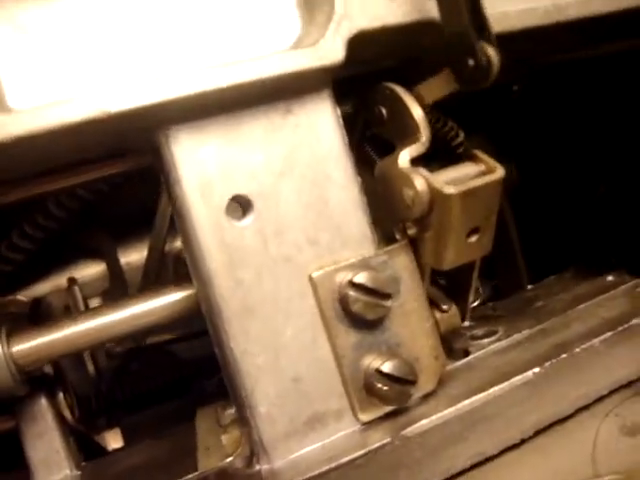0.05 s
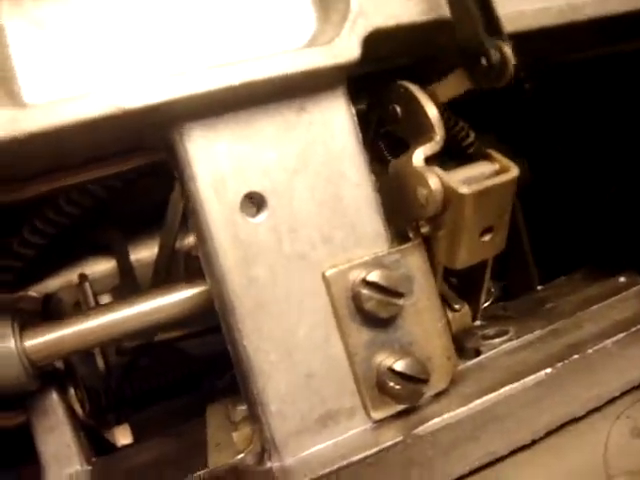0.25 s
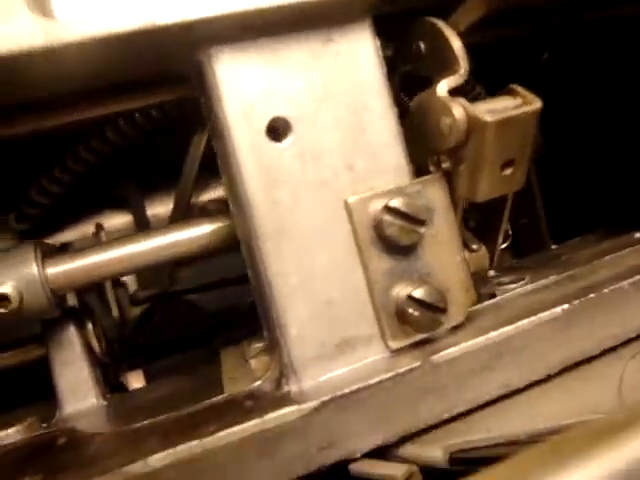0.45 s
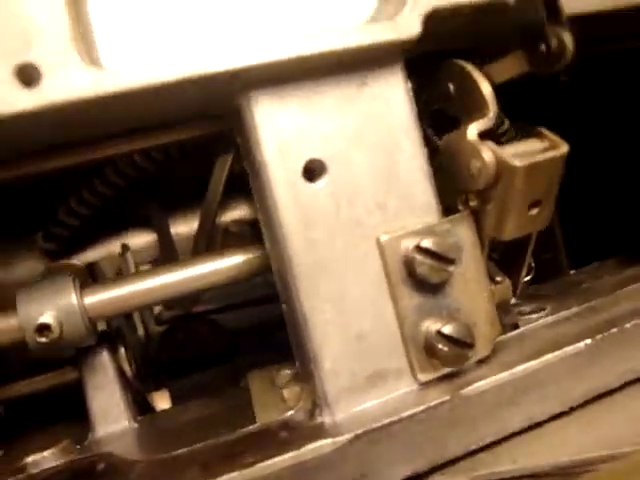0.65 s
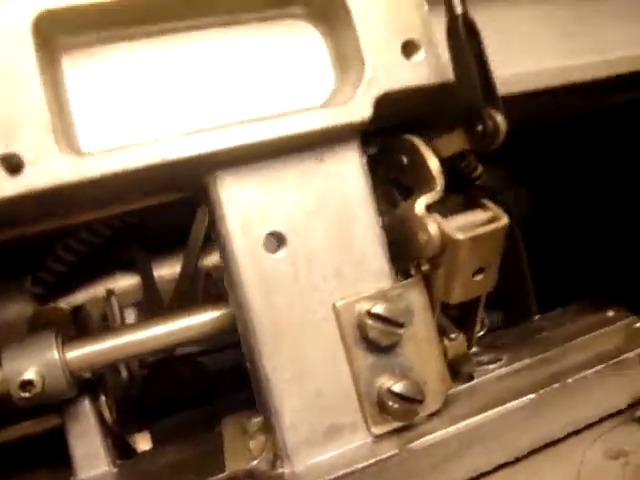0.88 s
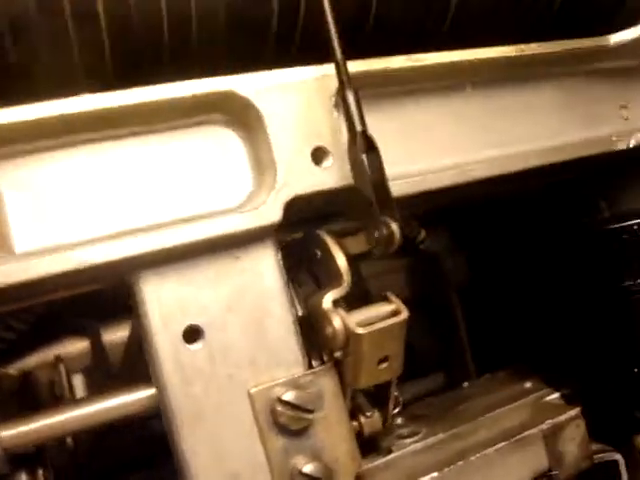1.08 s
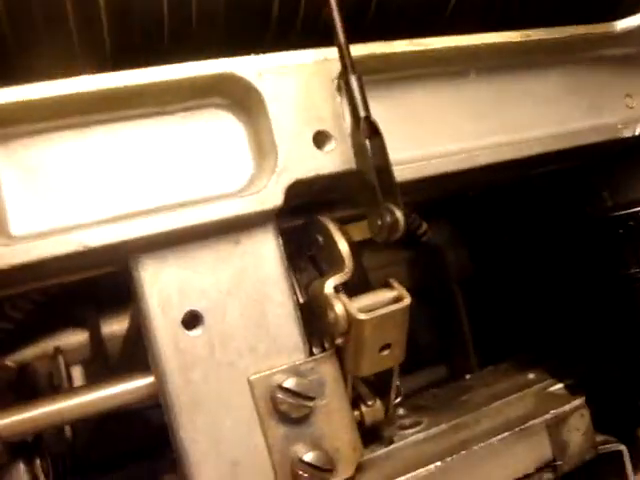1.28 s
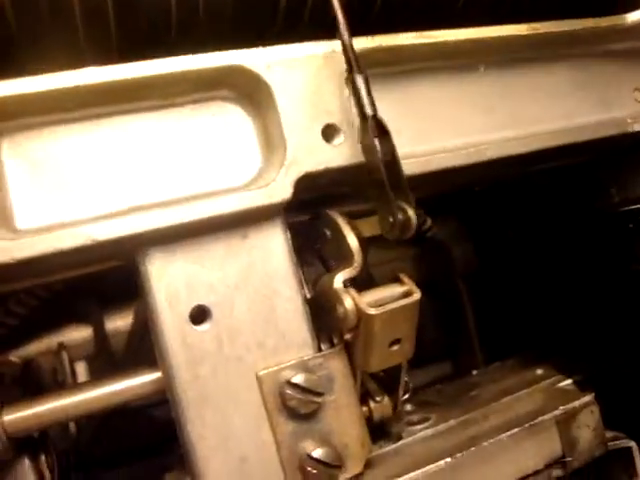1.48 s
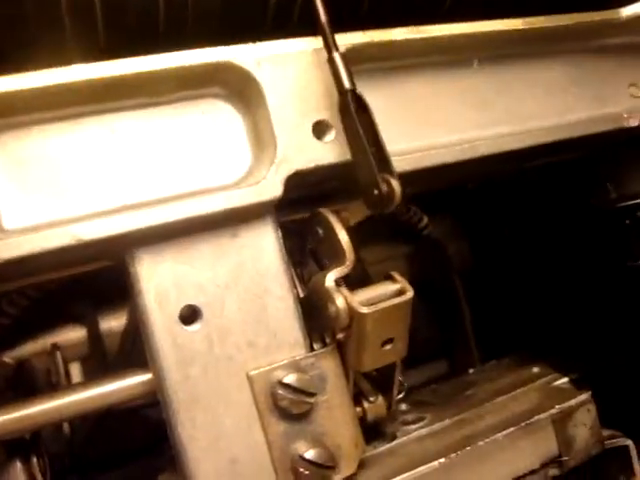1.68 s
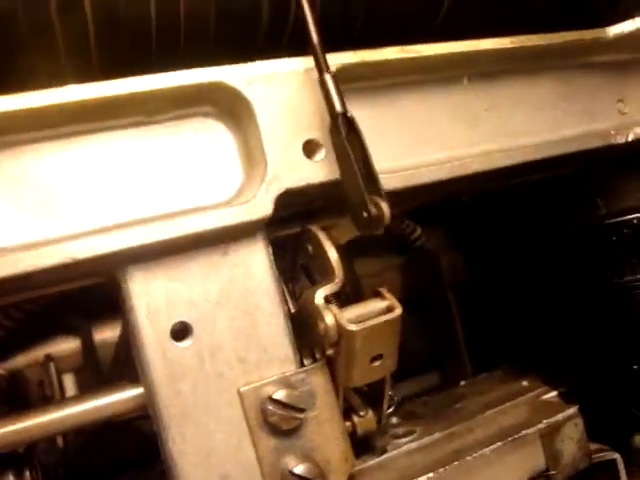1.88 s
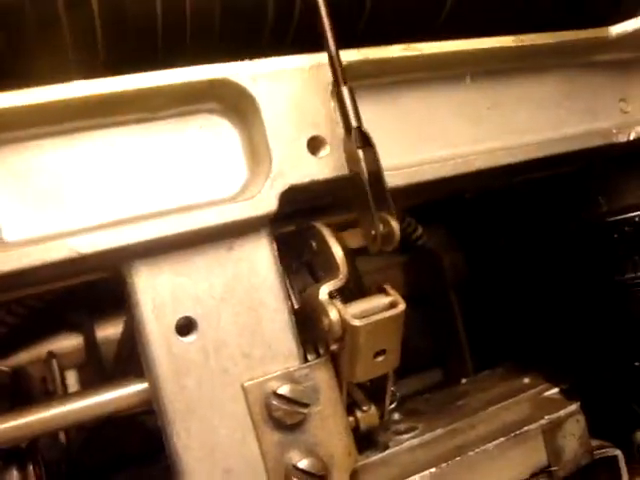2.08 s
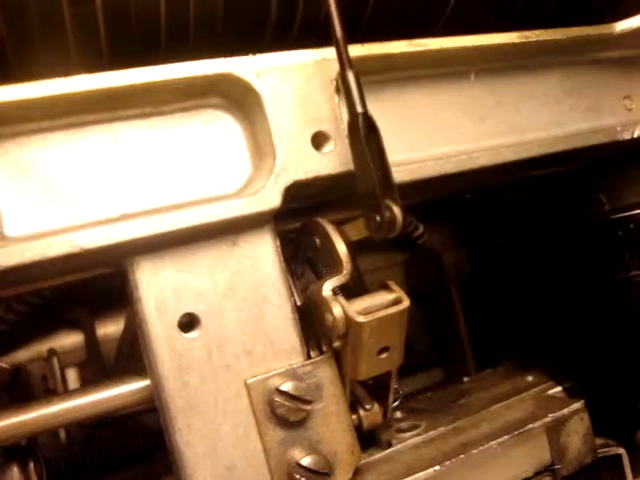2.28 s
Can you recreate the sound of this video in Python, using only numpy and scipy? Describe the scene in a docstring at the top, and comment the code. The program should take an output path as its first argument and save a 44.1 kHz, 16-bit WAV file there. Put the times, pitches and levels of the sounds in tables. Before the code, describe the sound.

Typewriter mechanism clicking slowly four times, sharp and metallic, over a faint hiss.

```python
"""A small room, close to a typewriter whose escapement is worked slowly by hand.
Four times a linkage trips in a quick cluster of metal contacts: pawls tick, levers clink, the frame rings.
Each contact drives the damped modes of the parts; the linkage lands on its stop, the heavy base hums on.
Between trips the parts rub and tap lightly, over a steady faint hiss and a thin, intermittent mains buzz."""
import sys
import numpy as np
from scipy import signal
from scipy.fft import rfft, irfft
from scipy.io import wavfile

SR = 44100
rng = np.random.default_rng(int(sys.argv[2]) if len(sys.argv) > 2 else 0)


def master(y):
    """Save y as 16-bit WAV."""
    cut = np.clip(np.atleast_2d(y).T, -1, 1)
    pcm = np.round(cut * 32767)  # scale
    wavfile.write(sys.argv[1], SR, pcm.astype(np.int16))


N = 108045


def amp(db):
    """Decibels to gain."""
    return 10 ** (np.asarray(db) / 20)


def fade(t, t60):
    """Exponential decay, 60 dB down after t60 seconds."""
    return np.exp(-np.log(1000) * t / t60)


def band(x, lo_hz, hi_hz):
    """Band-pass that keeps white noise near its rms."""
    sos = signal.butter(2, [lo_hz, hi_hz], "band", fs=SR, output="sos")
    return signal.sosfilt(sos, x) * np.sqrt(SR / 2 / (hi_hz - lo_hz))


def ringing(force, modes, spread=0.4):
    """Damped modes; each blow lands a little elsewhere and weights them anew."""
    out = np.zeros(N)
    for k, (hz, db, t60) in enumerate(modes):
        pole = np.exp(2j * np.pi * hz / SR) * fade(1 / SR, t60)
        push = force * (1 + spread * (2 * rng.random(N) - 1))
        ring = signal.lfilter([0, pole.imag], [1, -2 * pole.real, abs(pole) ** 2], push)
        out += (-1) ** k * amp(db) * ring
    return out / np.sqrt(sum(amp(db) ** 2 for _, db, _ in modes) / 2)


def struck(hits, modes):
    """Modes rung by single impulses."""
    force = np.zeros(N)
    for start_s, db in hits:
        force[int(start_s * SR)] += amp(db)
    return ringing(force, modes)


def hiss(rms_db=-56.5):
    """Steady room noise and microphone hiss."""
    # freq_hz, relative_density_db
    spectrum = [(18, -47), (30, -17), (54, -15.5), (231, -4), (491, -1.5), (568, -2), (838, -2),
                (924, -4.5), (1070, -5.5), (1500, -7.5), (2890, -10), (9300, -15.5), (10000, -16),
                (13000, -49), (22000, -120)]
    hz, db = np.array(spectrum).T
    bins_hz = np.maximum(np.fft.rfftfreq(N, 1 / SR), 1)
    shape = amp(np.interp(np.log(bins_hz), np.log(hz), db))
    noise = irfft(rfft(rng.standard_normal(N)) * shape, N)
    return noise * amp(rms_db) / np.std(noise)


def mains_buzz(mains_hz=60.02, first_tick_s=0.0104):
    """Electrical buzz in three spells: one thin tick per mains cycle."""
    # start_s, end_s, level_db
    spells = [(1.055, 1.15, -42.5), (1.32, 2.12, -40.5), (2.3, 2.45, -44.5)]
    # pitch_hz, relative_db, t60_s
    modes = [(5410, -7.5, 0.0056), (7150, -6, .001), (9100, -1.5, .0012)]
    cycles_s = np.arange(first_tick_s, N / SR, 1 / mains_hz)
    ticks = [(s, db) for start_s, end_s, db in spells for s in cycles_s if start_s < s < end_s]
    return struck(ticks, modes)


def room(x, gain_db=-8, t60_s=0.29, top_hz=2520, onset_s=0.0016):
    """Reflections: a short, dull, diffuse tail."""
    t = np.arange(SR // 2) / SR
    lowpass = signal.butter(2, top_hz, fs=SR, output="sos")
    noise = signal.sosfiltfilt(lowpass, rng.standard_normal(len(t)))
    decay = fade(t, t60_s)
    tail = noise * decay * (1 - np.exp(-t / onset_s)) / np.sqrt(np.sum(decay ** 2))
    return amp(gain_db) * signal.fftconvolve(x, tail)[:N]


def base_hum():
    """The heavy base is jolted and hums on."""
    # start_s, level_db
    jolts = [(.226, -50.5), (.311, -43), (.622, -56.5), (1.556, -62)]
    # pitch_hz, relative_db, t60_s
    modes = [(323, -13, 0.32), (427.8, 2.5, 0.38), (462, -7.5, .12), (520, -11.5, 0.088),
             (644, -12.5, 0.26)]
    return struck(jolts, modes)


def overload_bumps(sigma_s=0.00034):
    """A dull, one-sided bump as the microphone overloads on a sharp click in each trip."""
    # centre_s, peak_db
    bumps = [(.2880, -27.5), (.7318, -33), (1.5419, -28.5), (2.1663, -33.5)]
    t = np.arange(N) / SR
    return sum(amp(db) * np.exp(-((t - centre_s) / sigma_s) ** 2 / 2) for centre_s, db in bumps)


def linkage_stop():
    """The linkage lands: the stop knocks, the link pings."""
    # start_s, knock_db, ping_db
    landings = [(0.3041, -27.5, -27.5), (0.7754, -39, -27), (1.5510, -31, -31.5), (2.1468, -46, -42)]
    # pitch_hz, relative_db, t60_s
    stop_modes = [(832, -11, 0.042), (1104, -0.5, 0.057), (1248, -2, 0.031)]
    link_modes = [(2850, -4, 0.026), (2990, 5, 0.027), (3110, 3.5, 0.032)]
    knocks = struck([(s, db) for s, db, _ in landings], stop_modes)
    pings = struck([(s, db) for s, _, db in landings], link_modes)
    return knocks + pings


def rub_forces(grains_per_s=900, scatter_db=2.5, swell_db=1):
    """Sliding friction on frame, levers and pawls: fine grains that swell as the spring tightens."""
    # start_s, end_s, frame_db, lever_db, pawl_db
    rubs = [(0.2, .28, -56, -63, -72), (0.646, 0.724, -56.5, -57, -62.5), (1.884, 2.044, -66, -71, -73)]
    slips = rng.random(N) < grains_per_s / SR
    grains = slips * amp(scatter_db * np.clip(rng.standard_normal(N), -2, 2))
    t = np.arange(N) / SR
    force = np.zeros((3, N))
    for start_s, end_s, *db in rubs:
        sliding = (t > start_s) & (t < end_s)
        swell = amp(np.interp(t, [start_s, end_s], [-swell_db, 0]))
        force += amp(db)[:, None] * grains * swell * sliding
    return force


def contact_forces():
    """Impulses on frame, levers and pawls: four trips, and loose parts tapping as play is taken up."""
    # start_s, frame_db, lever_db, pawl_db
    trip_contacts = [ (0.2797, -48, -29.5, -62), (0.2817, -37.5, -52, -33), (.2870, -47, -23, -21.5),
                     (.2900, -38, -48, -26), (0.2934, -42, -28, -32), (0.3036, -41, -29.5, -53),
                     (.3073, -36, -28, -61), (0.3144, -38.5, -59, -35), (0.3363, -44, -36.5, -36),
                     (.7262, -48, -36.5, -34), (0.729, -37, -30.5, -26), (0.7328, -52, -52, -30.5),
                     (0.7371, -34, -56, -38), (0.7747, -38, -31, -31.5), (1.5333, -47, -43, -58),
                     (1.5371, -32.5, -34.5, -29.5), (1.5407, -37, -21, -26), (1.5505, -48.5, -28.5, -49),
                     (1.553, -37, -25.5, -22.5), (1.5610, -35.5, -45, -30.5), (1.5675, -44, -31, -29.5),
                     (1.5740, -37, -47, -40), (2.1458, -51, -47, -38), (2.1467, -36.5, -27.5, -34),
                     (2.1502, -51, -28, -34), (2.152, -60, -31, -27.5), (2.1585, -43, -33.5, -29),
                     (2.1657, -37, -33, -36.5)]
    loose_taps = [(.162, -39.5, -68, -70), (0.207, -46, -47, -39.5), (0.22, -41.5, -67, -79),
                  (0.244, -39.5, -41.5, -49), (.508, -45, -51.5, -68), (.558, -46.5, -57, -71),
                  (0.594, -61, -56, -48.5), (.621, -41, -62, -60), (.631, -57, -57, -51),
                  (.665, -45.5, -59, -47), (0.701, -50, -50, -54), (.793, -50, -62, -51),
                  (1.591, -49, -48, -66), (1.886, -47.5, -66, -73), (2.001, -47.5, -51, -46)]
    force = np.zeros((3, N))
    for start_s, *db in trip_contacts + loose_taps:
        force[:, int(start_s * SR)] += amp(db)
    return force


def metal_part(force, modes, lo_hz, hi_hz, t60, crack_db, clatter_db, ring_db):
    """Each blow gives a crack, a short clatter of crowded modes and the ring of the clear ones."""
    energy = signal.lfilter([1], [1, -fade(2 / SR, t60)], force ** 2)
    clatter = amp(clatter_db) * np.sqrt(energy) * rng.standard_normal(N)
    crack = amp(crack_db) * force
    ring = amp(ring_db) * ringing(force, modes)
    return band(clatter - crack, lo_hz, hi_hz) + ring


def escapement():
    """Contacts and friction drive the low frame, the brighter levers and the small, high pawls."""
    # clear modes: pitch_hz, relative_db, t60_s
    frame_modes = [(566, -16.5, .08), (724, -5, 0.056), (774, -4, 0.094), (810.5, -11.5, 0.33),
                   (1036, -10.5, 0.11), (1080, -12, 0.27), (1246, -20, .3), (1285, -11, 0.062)]
    lever_modes = [(2157, -17, 0.094), (2486, -2.5, 0.027), (2567, -11.5, 0.085), (3034, 0.5, 0.062),
                   (3020, 2.5, 0.023), (3122, -2.5, 0.034), (3420, -2, 0.046), (3800, -34, 0.02),
                   (4030, -2, 0.028), (4340, -8, 0.071), (4410, -3, 0.03), (4670, -2, 0.01)]
    pawl_modes = [(5520, -1.5, 0.028), (5870, 10.5, 0.025), (6460, -4, 0.031), (6590, -11, 0.018),
                  (6500, -15.5, 0.011), (6770, -5, 0.014), (7730, -10, .022), (7830, -1, 0.03),
                  (8330, 9.5, 0.011), (8800, -30, 0.017), (9450, -6, .02), (9240, -11, 0.0093)]
    # band and t60_s of the crowded modes; gains of crack, clatter and ring
    frame = dict(lo_hz=387, hi_hz=1440, t60=0.064, crack_db=-2, clatter_db=-6.5, ring_db=-10)
    lever = dict(lo_hz=2206, hi_hz=5100, t60=0.029, crack_db=10.5, clatter_db=-3.5, ring_db=-4.5)
    pawl = dict(lo_hz=6000, hi_hz=9680, t60=0.02, crack_db=12.5, clatter_db=-1.5, ring_db=-6.5)
    frame_force, lever_force, pawl_force = contact_forces() + rub_forces()
    return (metal_part(frame_force, frame_modes, **frame)
            + metal_part(lever_force, lever_modes, **lever)
            + metal_part(pawl_force, pawl_modes, **pawl))


def scene():
    """The machine, its room, buzz and hiss, in mono."""
    machine = escapement() + linkage_stop() + base_hum()
    return (machine + room(machine) + overload_bumps() + mains_buzz() + hiss())[None]


def record(dry):
    """Steep low-pass on the top treble."""
    top_hz = 9900
    return signal.sosfilt(signal.ellip(10, 0.2, 70, top_hz, fs=SR, output="sos"), dry)


dry = scene()
out = record(dry)
master(out)
```